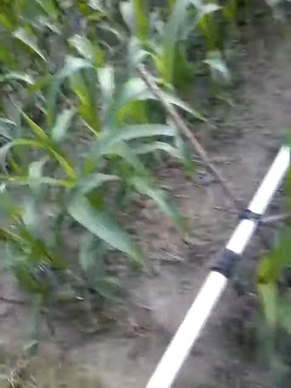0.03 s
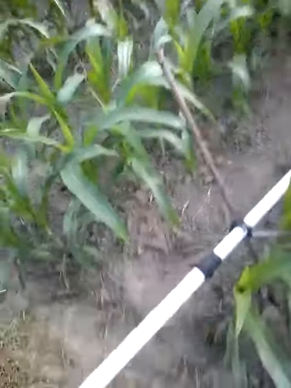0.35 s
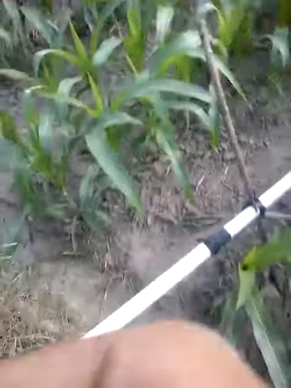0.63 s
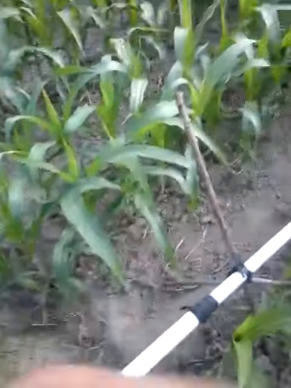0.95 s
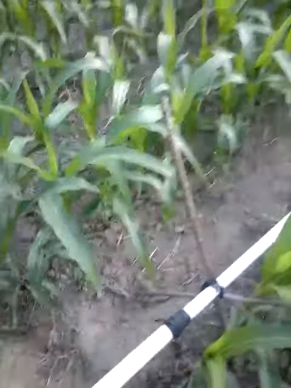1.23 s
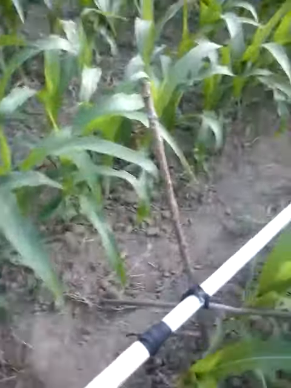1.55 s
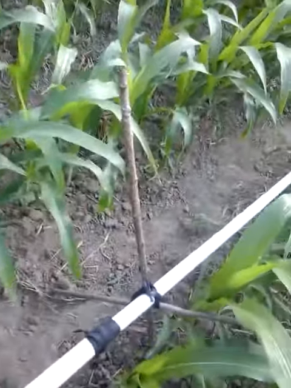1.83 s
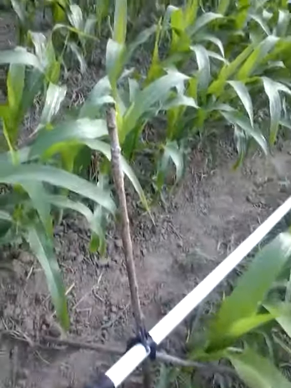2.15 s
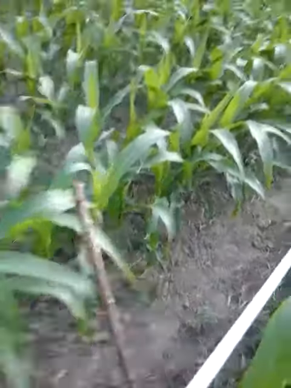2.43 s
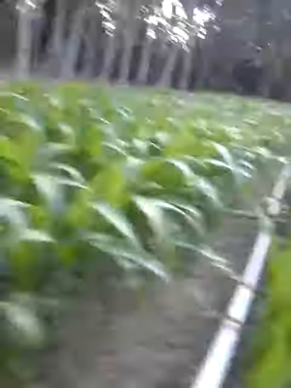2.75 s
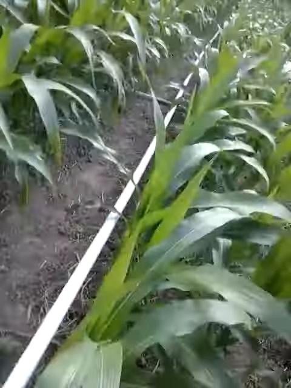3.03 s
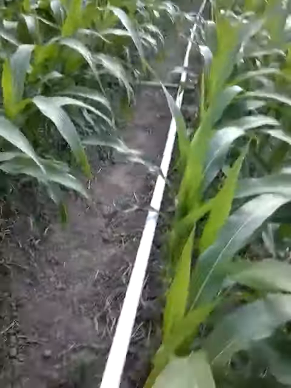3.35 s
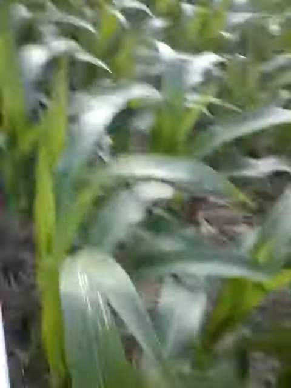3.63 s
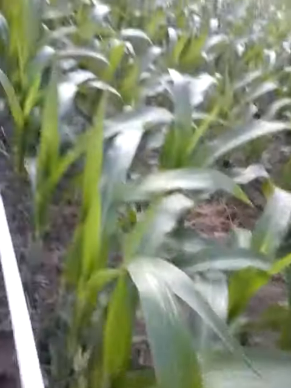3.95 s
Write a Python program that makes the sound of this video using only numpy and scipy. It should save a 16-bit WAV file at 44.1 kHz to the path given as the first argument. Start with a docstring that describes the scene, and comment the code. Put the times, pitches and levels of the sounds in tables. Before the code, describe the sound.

Water from an irrigation pipe sprays corn leaves and soil in a dense, sizzling patter, with fat drops ticking close by. Early on a finger rubs near the microphone; later the spray brightens and wind thumps briefly.

```python
"""A dense, sizzling patter of water: an irrigation pipe sprays the leaves and soil of a maize field. Fat drops
tick, crack and plop close by, and the spray is at its brightest past the middle. Early on, a finger rubs near
the phone's microphone with a smooth hiss, then cups it and turns the spray hollow; a narrow hiss almost
whistles at the microphone's resonance. A low rumble lies under it all, with one brief hum; soft low thumps
knock the phone, hardest as it swings round."""
import sys
import numpy as np
from scipy import signal
from scipy.fft import rfft, irfft
from scipy.io import wavfile
from scipy.ndimage import map_coordinates

SR = 44100
rng = np.random.default_rng(int(sys.argv[2]) if len(sys.argv) > 2 else 0)


def master_out(mix):
    """Clip the mix to full scale and print it as 16-bit PCM to the path in sys.argv[1]."""
    frames = np.transpose(np.atleast_2d(mix))
    ceiling = np.clip(frames, -1, 1)
    pcm = np.round(ceiling * 32767).astype(np.int16)
    wavfile.write(sys.argv[1], SR, pcm)


N = 176400

# Faders of the spray (time [s], sizzle level [dB], patter level [dB], splatter level [dB])
SPRAY_LEVELS = [(0, -39, -43.5, -40.5), (0.1, -44.5, -47, -47.5), (0.16, -52, -52, -44.5),
                (0.26, -46, -58, -44), (0.36, -35.5, -50, -45), (0.6, -43, -50.5, -44.5),
                (0.7, -46, -50, -48), (0.8, -40, -45, -45.5), (0.97, -44.5, -44, -46.5),
                (1.1, -41, -43, -44), (1.23, -36.5, -44.5, -46.5), (1.35, -39, -42.5, -42.5),
                (1.5, -38, -40, -43), (1.68, -36.5, -40, -45), (1.745, -38.5, -35.5, -41.5),
                (1.8, -38.5, -38, -46.5), (2.1, -36.5, -36, -42.5), (2.3, -36, -35.5, -46),
                (2.42, -35, -37.5, -41.5), (2.52, -27, -35, -41.5), (2.63, -29, -31.5, -44.5),
                (2.7, -31.5, -36.5, -41), (2.78, -28, -34, -41.5), (2.86, -30, -32.5, -40.5),
                (2.92, -33.5, -37.5, -45), (3.1, -37.5, -44.5, -44.5), (3.3, -42.5, -43.5, -48),
                (3.47, -42, -41, -48), (3.58, -39.5, -43, -48), (3.68, -48, -52.5, -52),
                (3.87, -53, -49, -53), (3.92, -39, -42.5, -50.5), (4.0, -50, -50, -49)]
# Fader of the top fizz, up when drops land near (time [s], level [dB])
FIZZ_LEVEL = [(0, -49), (.1, -56.5), (.35, -48.5), (.7, -61), (1.0, -58), (1.6, -58), (1.8, -52.5),
              (2.35, -48.5), (2.6, -46.5), (2.85, -39), (3.0, -52.5), (3.3, -53), (3.45, -60), (3.85, -70),
              (3.92, -52.5), (4, -65)]
# EQ of each spray layer, from top to bottom (frequency [Hz], gain [dB])
FIZZ_EQ = [(6500, -21), (8500, 6), (10000, 0.5), (12000, -7), (14000, -17)]
SIZZLE_EQ = [(3500, -30), (4600, -30), (5400, -7), (6000, 1.5), (6450, 0), (7200, -6), (8000, -11),
             (9000, -20.5), (10800, -35.5), (14000, -47)]
PATTER_EQ = [(1500, -22.5), (2300, -4.5), (3000, -4.5), (4000, -1), (4900, 3), (5800, 0.5), (7500, -24.5)]
SPLATTER_EQ = [(200, -15.5), (400, -12), (700, -10), (1100, 0), (1500, 0.5), (1900, 3.5), (2400, -3.5),
               (3300, -10)]


def spray():
    """Water falls in uneven flurries: fizz, sizzle and patter on the leaves, splatter on wet soil."""
    sizzle_level, patter_level, splatter_level = faders(SPRAY_LEVELS)
    flurry_db = .9 * wander(50) + .9 * wander(170)

    sizzle = shower(4380, 9160, cycles=2.1, spread_db=5, ring_db=-2, mist_db=1.5, count=5000)
    sizzle = colour(sizzle, SIZZLE_EQ) * sizzle_level * undb(-1 + 1.2 * wander(60))

    fizz = shower(7680, 13200, cycles=5.2, spread_db=4, ring_db=-4, mist_db=6.5, count=1800)
    fizz = colour(fizz, FIZZ_EQ) * faders(FIZZ_LEVEL)[0] * undb(1.7 * wander(70))

    patter = shower(2260, 5450, cycles=1.8, spread_db=4, ring_db=-1, mist_db=5, count=3500)
    patter = colour(patter, PATTER_EQ) * patter_level * undb(.5 + .83 * wander(50))

    splatter = shower(602, 2600, cycles=1.72, spread_db=3.5, ring_db=-3, mist_db=5, count=2400)
    splatter = colour(splatter, SPLATTER_EQ) * splatter_level * undb(1.03 * wander(25.02))
    return (sizzle + fizz + reflected(patter + splatter)) * undb(flurry_db)


def shower(low_hz, high_hz, cycles, spread_db, ring_db, mist_db, count):
    """Random drops of mixed size: sharp impacts, short rings and a mist of countless tiny ones."""
    impacts, rings = np.zeros(N), np.zeros(N)
    for when, pitch, length, rank, polarity in rng.random((count, 5)):
        start = when * N / SR
        size = undb(-spread_db * np.log(rank + .045))  # the offset caps the rare big drops
        hz = low_hz * (high_hz / low_hz) ** pitch
        add(rings, start, size * ping(hz, cycles * (.5 + length)))
        add(impacts, start, np.array([np.sign(polarity - .5) * size]))
    mist = rng.standard_normal(N)
    return unit(impacts) + undb(ring_db) * unit(rings) + undb(mist_db) * mist


# Bounce off a nearby surface (time [s], delay [ms], strength [0-1])
REFLECTION = [(0, 0.54, 0.12), (.65, 0.65, 0.06), (.75, 1.06, 0.14), (1.25, 1, 0.25), (1.6, 1.02, 0.14),
              (2.25, 1.12, 0.14), (2.55, 0.51, 0.17), (2.9, 0.72, 0.2), (3.1, 0.603, 0.34),
              (3.5, 0.53, 0.31), (3.7, 0.84, 0.1), (4, 0.73, 0)]


def reflected(direct):
    """A short reflection shifts as the phone moves: light flanging at about the same loudness."""
    samples = np.arange(N)
    times, delays_ms, strengths = np.array(REFLECTION, float).T
    delay = np.interp(samples / SR, times, delays_ms) * SR / 1000
    strength = np.interp(samples / SR, times, strengths)
    bounce = map_coordinates(direct, [samples - delay], mode="mirror")
    return (direct + strength * bounce) / np.sqrt(1 + strength ** 2)


# Close ticks on the leaves (time [s], ring peak [dB], ring pitch [Hz])
FAT_DROPS = [(.019, -23, 6750), (.349, -23, 6100), (0.371, -20, 6050), (.402, -20.5, 6070),
             (.427, -22, 6200), (0.9871, -16.5, 6750), (1.158, -26, 6240), (1.3497, -24.5, 5630),
             (1.395, -21.5, 5770), (1.5538, -16, 5300), (1.579, -23.5, 4550), (1.653, -18.5, 5470),
             (1.6745, -33, 6300), (1.735, -22, 5970), (1.8031, -19, 3050), (1.949, -17, 4460),
             (1.958, -14, 6470), (2.070, -24, 6040), (2.099, -16, 6050), (2.102, -18, 7100),
             (2.1368, -10, 6270), (2.1525, -16, 5960), (2.219, -13, 5830), (2.3305, -19, 5970),
             (2.399, -22.5, 3400), (2.43, -15, 6400), (2.502, -18, 6250), (2.535, -14.5, 6300),
             (2.604, -12, 5750), (2.624, -9.5, 6240), (2.645, -13, 6240), (2.6635, -11.5, 6150),
             (2.704, -10.5, 6400), (2.7225, -16.5, 6800), (2.754, -17, 6400), (2.858, -20, 3130),
             (3.009, -19, 5570), (3.0151, -12.5, 6020), (3.0414, -18.5, 6500), (3.065, -19, 6300),
             (3.2061, -18, 6650), (3.6583, -19.5, 5620), (3.908, -24, 6000)]
# EQ of the click on the leaf (frequency [Hz], gain [dB])
CLICK_EQ = [(1500, -8), (4000, -2), (6200, 2), (8500, -9), (11000, -22), (14000, -34)]


def fat_drops(click_db=-17, click_decay_s=.0007, splash_db=-15, splash_decay_s=.004):
    """Each near drop clicks on a leaf, rings for an instant and scatters a brief splash."""
    out, click_envelope = np.zeros(N), np.zeros(N)
    t = np.arange(SR // 20) / SR
    for start, db, hz in FAT_DROPS:
        splash = unit(bandpass(rng.standard_normal(len(t)), .75 * hz, 1.17 * hz))
        add(out, start, undb(db) * ping(hz, cycles=2))
        add(out, start, undb(db + splash_db) * splash * np.exp(-t / splash_decay_s))
        add(click_envelope, start, undb(db + click_db) * np.exp(-t / click_decay_s))
    return out + click_envelope * noise(CLICK_EQ)


# Dry, bright hits (time [s], level [dB])
CRACKS = [(1.737, -24.5), (2.048, -25.5), (2.084, -45), (2.265, -24.5), (2.705, -24), (2.724, -18.5),
          (2.852, -25), (2.861, -23), (3.015, -32), (3.0682, -26), (3.290, -28.5), (3.560, -33)]
# EQ of the cracks (frequency [Hz], gain [dB])
CRACK_EQ = [(2000, -4), (4500, 1), (6400, 13), (8500, -2), (11000, -9), (14000, -18)]


def cracks(decay_s=.0044):
    """Drops burst right beside the microphone: snaps of noise with no ring."""
    envelope = np.zeros(N)
    t = np.arange(SR // 50) / SR
    for start, db in CRACKS:
        add(envelope, start, undb(db) * np.exp(-t / decay_s))
    return envelope * noise(CRACK_EQ)


# Puddle hits (time [s], peak [dB], bubble pitch [Hz])
PLOPS = [(1.088, -29, 980), (1.093, -31.5, 1070), (1.29, -34, 2570), (1.379, -33.5, 2000),
         (1.6755, -29.5, 2310), (1.959, -27, 1620), (2.254, -28.5, 1860), (2.5634, -27, 1660),
         (2.828, -30, 1460), (2.875, -29, 1490), (3.033, -29, 1620)]


def plops():
    """Drops that land in a puddle trap a bubble, which rings briefly."""
    out = np.zeros(N)
    for start, db, hz in PLOPS:
        add(out, start, undb(db) * ping(hz, cycles=2.36))
    return out


# Fader of the finger rub (time [s], level [dB])
RUB_LEVEL = [(.11, -51), (.15, -36.5), (.22, -38.5), (.26, -34), (.30, -40), (.48, -40.5), (.58, -37.5),
             (.65, -39.5), (.70, -52), (.79, -41.5), (.92, -52)]
# Its bright, airy EQ (frequency [Hz], gain [dB])
RUB_EQ = [(3000, -14.5), (4500, 6), (6300, 13), (8200, 2.5), (10500, -4.5), (13000, -0.5), (14500, -7)]


def finger_rub(waver_db=1.0):
    """A finger rubs near the microphone: a smooth, bright hiss that swells and falls back."""
    return noise(RUB_EQ) * faders(RUB_LEVEL)[0] * undb(waver_db * wander(43.7))


# Fader of the narrow hiss (time [s], level [dB])
NARROW_HISS_LEVEL = [(.28, -53), (.36, -40), (.44, -42), (.52, -49), (.64, -43), (.72, -62), (.92, -52),
                     (1.0, -42), (1.2, -40.5), (1.27, -50), (1.45, -59)]
# Its single sharp EQ peak (frequency [Hz], gain [dB])
NARROW_HISS_EQ = [(5300, -16), (5850, -4.5), (6250, 10), (6600, 1.5), (7300, -21)]


def narrow_hiss():
    """A narrow, almost whistling hiss at the microphone's resonance."""
    return noise(NARROW_HISS_EQ) * faders(NARROW_HISS_LEVEL)[0]


# Fader of the hollow tone (time [s], level [dB])
HOLLOW_LEVEL = [(.68, -54.5), (.77, -44.5), (.88, -52.5), (.95, -42), (1.12, -50.5), (1.22, -52),
                (1.32, -68)]
# Resonances under the finger (centre [Hz], width [Hz], gain [dB])
HOLLOW_RESONANCES = [(405, 280, -6.5), (770, 115, -2.5), (1090, 280, -3.5), (1775, 79, 1), (1904, 190, -3),
                     (2930, 320, -1)]


def finger_hollow():
    """The wash of the spray rings in the hollow of a finger cupping the microphone."""
    wash = shower(505, 3300, cycles=1.5, spread_db=5, ring_db=-2, mist_db=5, count=3000)
    out = np.zeros(N)
    for hz, width, db in HOLLOW_RESONANCES:
        out += undb(db) * bandpass(wash, hz - width / 2, hz + width / 2)
    return unit(out) * faders(HOLLOW_LEVEL)[0]


# EQ of the rumble bed (frequency [Hz], gain [dB])
RUMBLE_EQ = [(20, -26), (40, -16), (65, -6), (100, -2), (135, 0.5), (175, -6), (220, -16), (330, -12.5),
             (600, -11.5), (1500, -32.5)]
# Low thumps (time [s], level [dB], half length [s], upper edge [Hz])
THUMPS = [(0.768, -46, 0.019, 197), (0.897, -44, 0.0068, 141), (1.193, -47, 0.0062, 222),
          (1.934, -40, 0.0077, 209), (2.657, -36.5, 0.011, 190), (2.68, -27.5, 0.014, 230),
          (2.698, -23, 0.005, 370), (2.707, -21.5, 0.0024, 480), (2.727, -22.5, 0.0088, 268),
          (2.746, -32, 0.0064, 290), (2.845, -37.5, 0.0041, 209)]


def rumble_and_thumps(rumble_db=-53, waver_db=.8, thump_low_hz=100):
    """A low outdoor rumble and short, soft low thumps."""
    t = np.arange(N) / SR
    out = noise(RUMBLE_EQ) * undb(rumble_db + waver_db * wander(9.7))
    for when, db, half_s, edge_hz in THUMPS:
        swell = np.exp(-.5 * ((t - when) / half_s) ** 2)
        thump = bandpass(rng.standard_normal(N), thump_low_hz, edge_hz) * swell
        makeup_gain = np.sqrt(np.sum(swell ** 2) / np.sum(thump ** 2))
        out += undb(db) * makeup_gain * thump
    return out


# One low note (start [s], peak [dB], pitch [Hz], rise [s], pitch sag [Hz/s])
HUM = (1.995, -41, 120, 0.025, 59)


def hum():
    """A low tone swells after one of the thumps and sags in pitch as it dies."""
    start, db, hz, rise, sag = HUM
    t = np.maximum(np.arange(N) / SR - start, 0)
    envelope = t / rise * np.exp(1 - t / rise)
    return undb(db) * envelope * np.sin(2 * np.pi * (hz * t - sag * t ** 2 / 2))


def ping(hz, cycles):
    """A ring that swells for some cycles to a peak of 1 and dies away."""
    turns = np.arange(int(8 * cycles * SR / hz) + 2) * hz / SR
    envelope = turns / cycles * np.exp(1 - turns / cycles)
    return envelope * np.sin(2 * np.pi * turns)


def colour(x, eq):
    """Causal EQ through (Hz, dB) points; the result has rms 1."""
    hz, db = np.array(eq, float).T
    f = np.maximum(np.arange(N // 2 + 1) * SR / N, 1)
    octaves_outside = np.maximum(np.log2(hz[0] / f), 0) + np.maximum(np.log2(f / hz[-1]), 0)
    gain_db = np.interp(np.log(f), np.log(hz), db) - 10 * octaves_outside
    cepstrum = irfft(np.log(undb(gain_db)), N)
    cepstrum[1:N // 2] *= 2  # fold to minimum phase, so attacks stay crisp
    cepstrum[N // 2 + 1:] = 0
    return unit(irfft(rfft(x) * np.exp(rfft(cepstrum)), N))


def noise(eq):
    """White noise through an EQ, at rms 1."""
    return colour(rng.standard_normal(N), eq)


def bandpass(x, low_hz, high_hz):
    """A gentle band filter."""
    return signal.sosfilt(signal.butter(2, [low_hz, high_hz], "band", fs=SR, output="sos"), x)


def faders(table):
    """Gain over time for each dB column of a table."""
    times, *levels = np.array(table, float).T
    return [undb(np.interp(np.arange(N) / SR, times, db)) for db in levels]


def wander(rate_hz):
    """Random modulation with rms 1."""
    points = rng.standard_normal(2000)
    return unit(np.interp(np.arange(N) / SR * rate_hz, np.arange(len(points)), points))


def add(out, start_s, sound):
    """Mix a sound in at a time."""
    i = int(np.clip(start_s * SR, 0, N - 1))
    out[i:i + len(sound)] += sound[:N - i]


def undb(db):
    """Decibels to gain."""
    return 10 ** (np.asarray(db) / 20)


def unit(x):
    """Scale to rms 1."""
    return x / np.sqrt(np.mean(x ** 2) + 1e-18)


def scene():
    """Water and handling noise in front, rumble, thumps and hum behind, mixed to mono."""
    front = spray() + narrow_hiss() + finger_hollow() + fat_drops() + plops() + cracks() + finger_rub()
    return (front + rumble_and_thumps() + hum())[None]


def record(dry):
    """The phone cuts the top steeply above 14 kHz."""
    return signal.sosfilt(signal.ellip(10, .2, 80, 14000, fs=SR, output="sos"), dry)


dry = scene()
out = record(dry)
master_out(out)
```